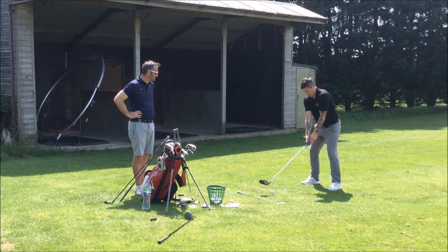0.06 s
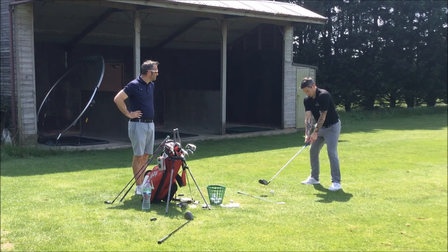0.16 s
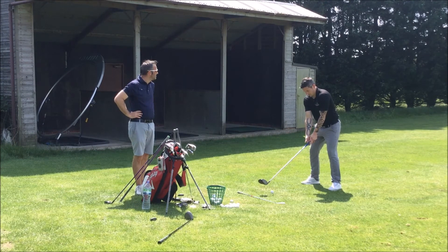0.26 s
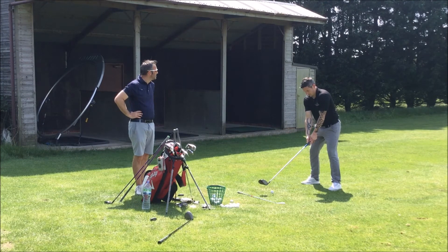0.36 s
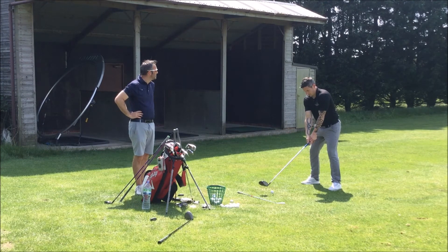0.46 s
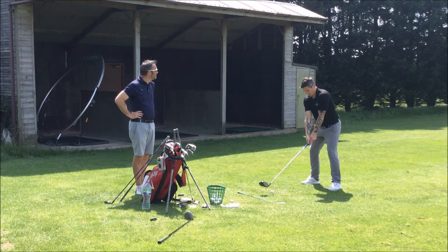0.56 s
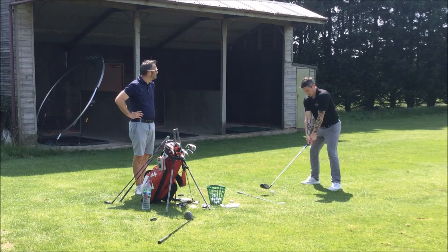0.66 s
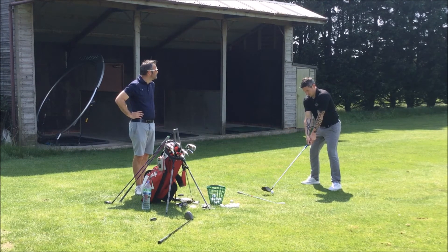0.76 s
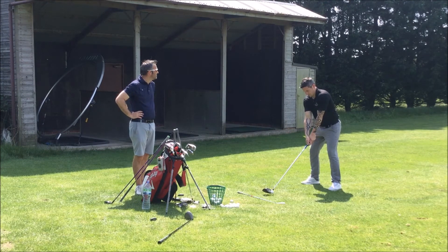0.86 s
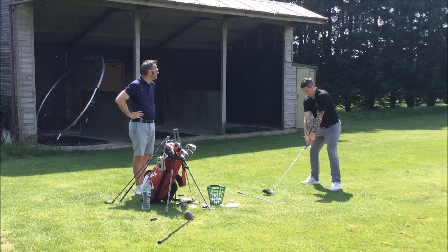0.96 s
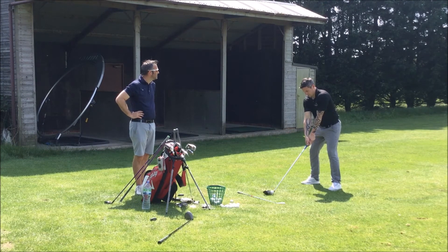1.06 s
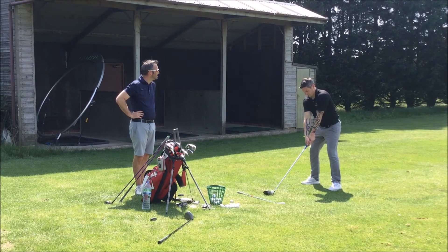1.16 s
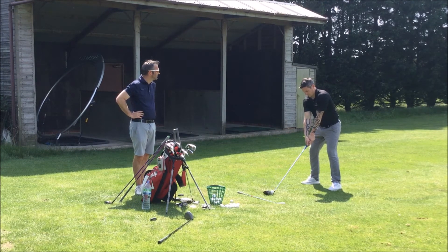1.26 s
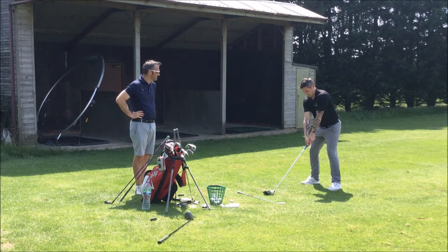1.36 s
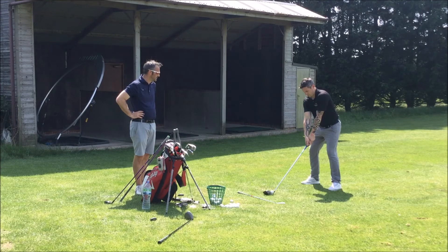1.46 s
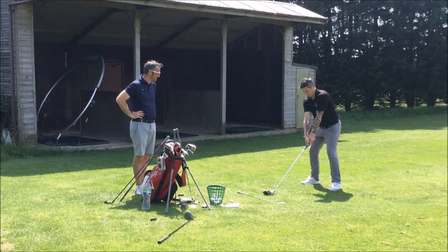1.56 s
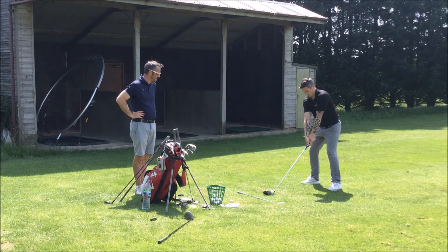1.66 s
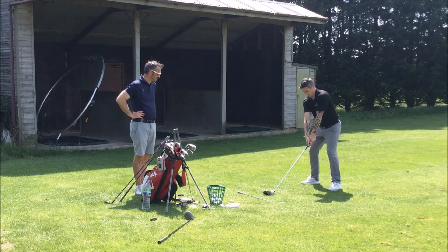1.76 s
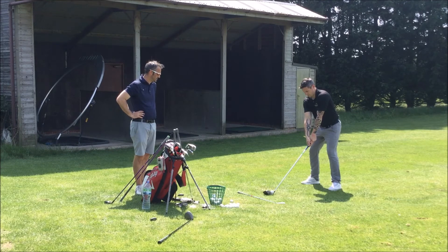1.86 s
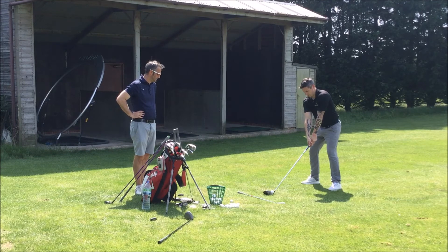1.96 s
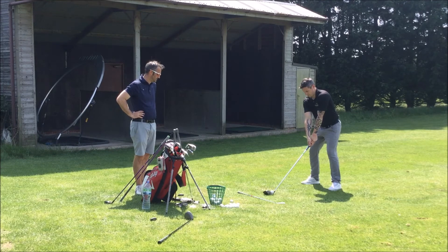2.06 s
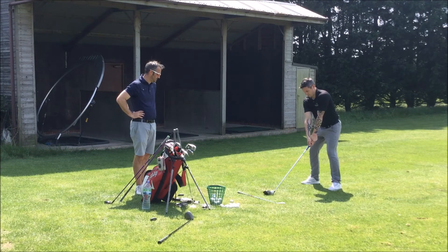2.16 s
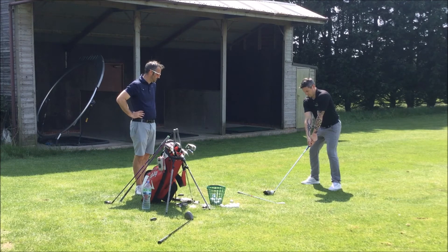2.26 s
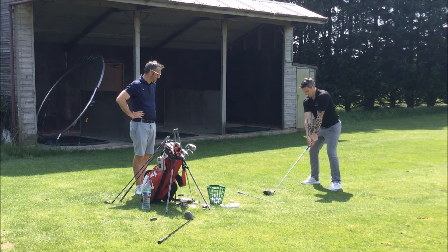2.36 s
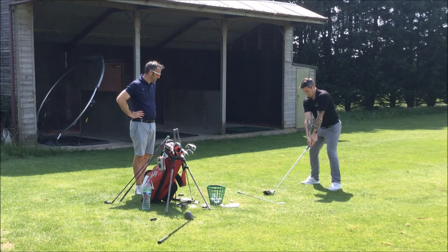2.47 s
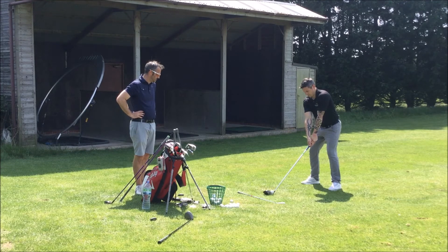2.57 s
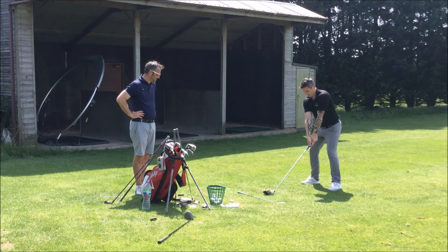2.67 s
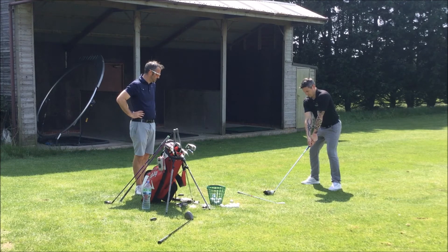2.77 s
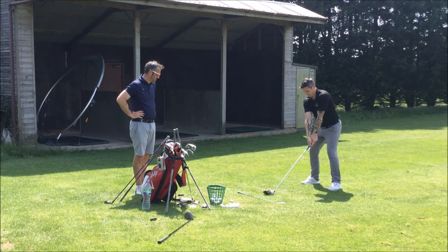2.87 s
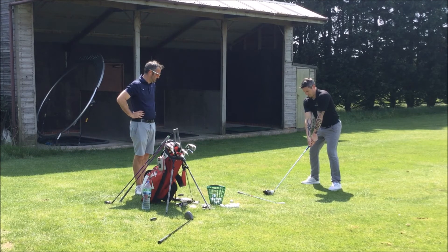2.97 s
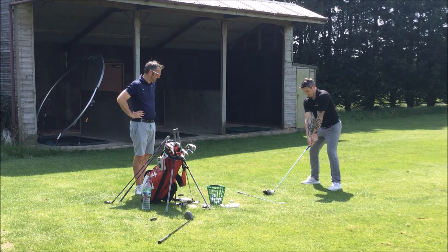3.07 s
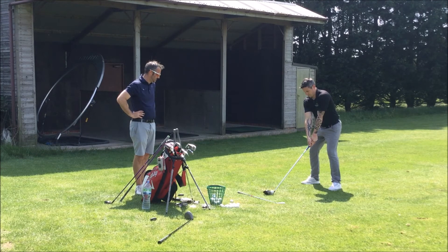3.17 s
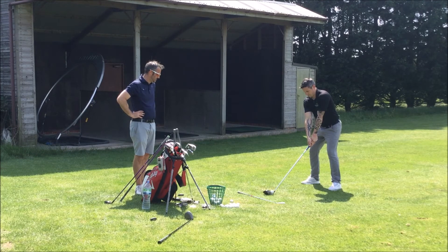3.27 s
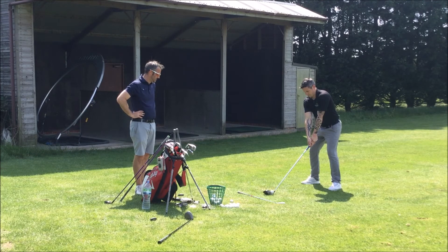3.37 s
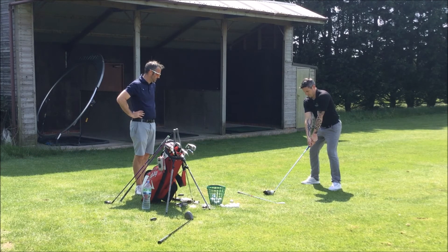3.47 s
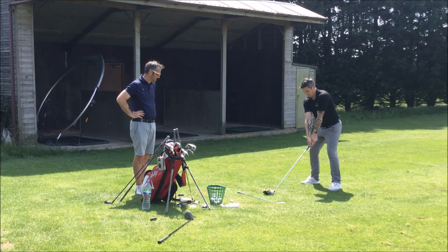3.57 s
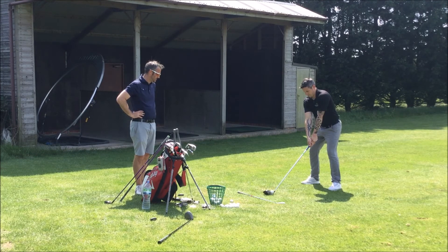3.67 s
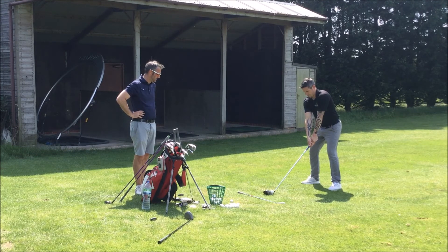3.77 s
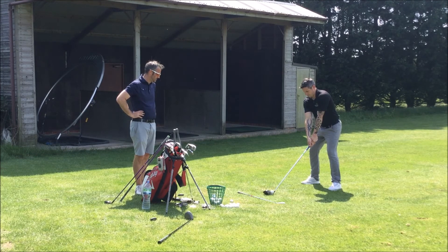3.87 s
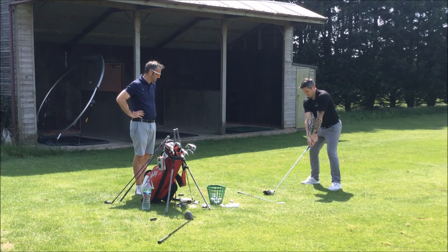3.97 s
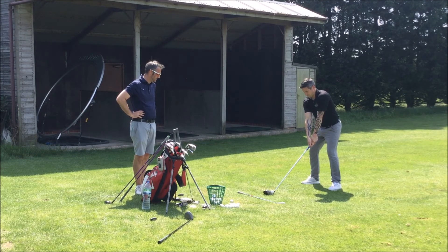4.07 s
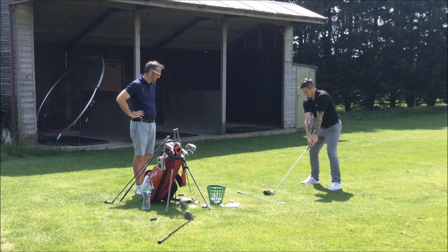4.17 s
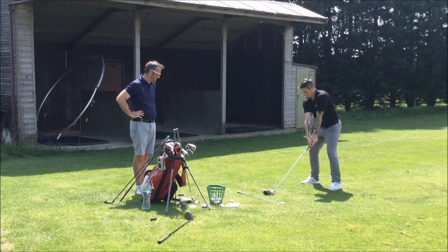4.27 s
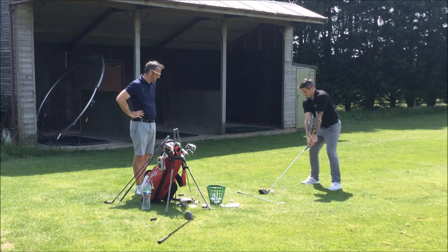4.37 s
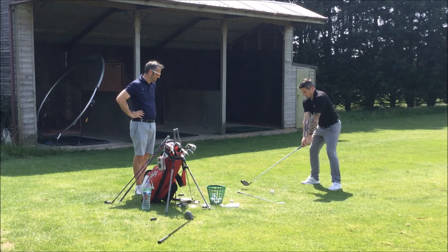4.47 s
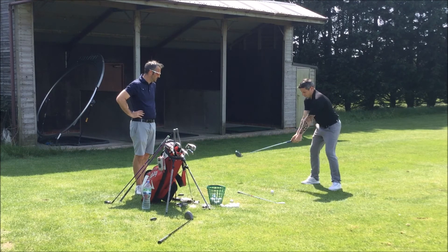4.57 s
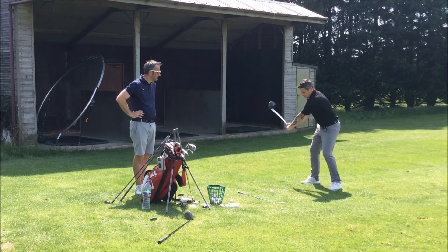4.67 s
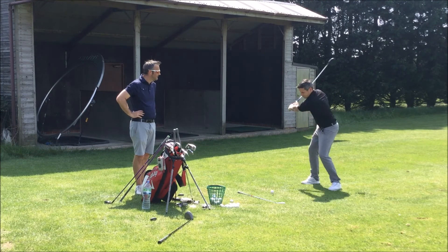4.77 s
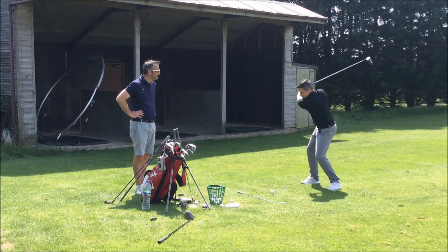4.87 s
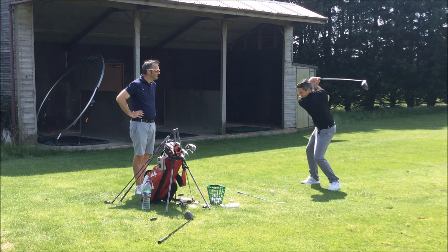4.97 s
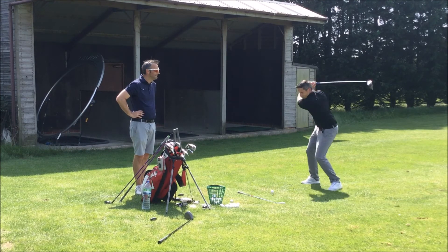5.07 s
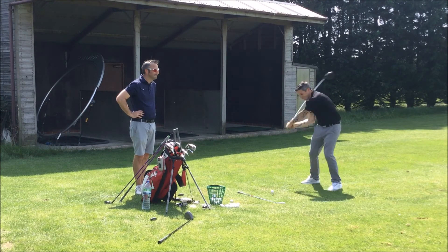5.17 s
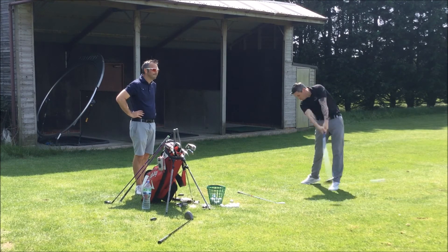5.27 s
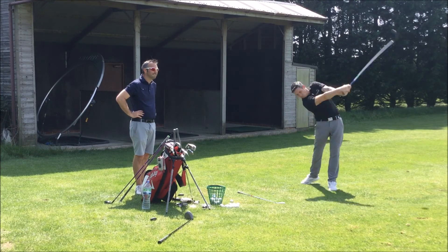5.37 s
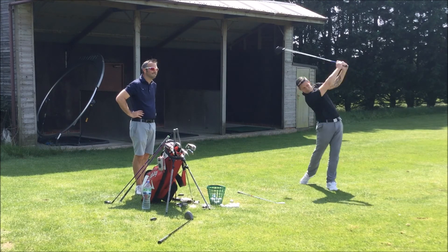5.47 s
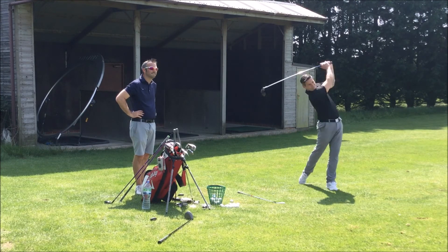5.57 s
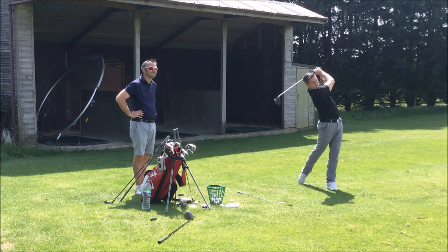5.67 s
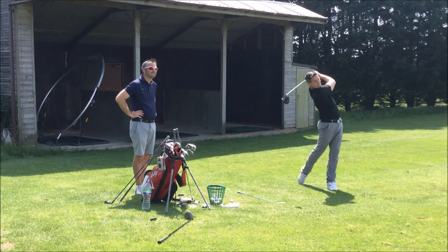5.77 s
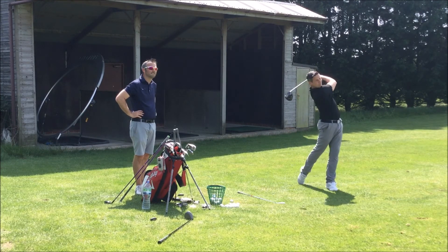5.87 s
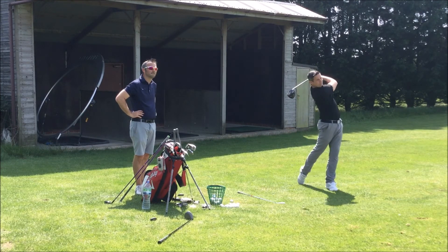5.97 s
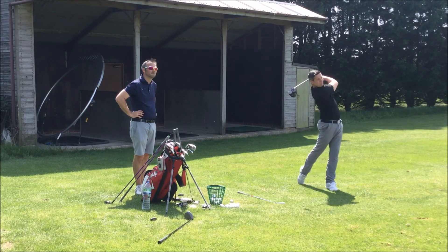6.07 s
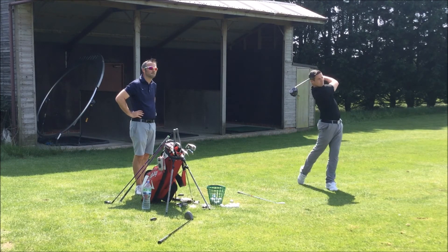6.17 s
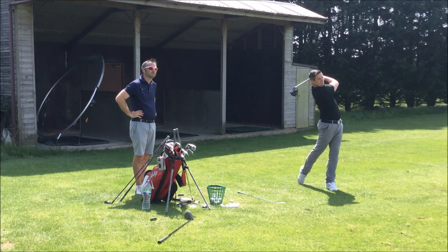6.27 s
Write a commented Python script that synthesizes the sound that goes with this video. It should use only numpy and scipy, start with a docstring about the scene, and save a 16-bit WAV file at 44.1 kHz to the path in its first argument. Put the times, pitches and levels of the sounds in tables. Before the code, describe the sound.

For the first five seconds the scene is very quiet: a low, fluttering distant rumble with slow swells around 0.6, 1.4, 2.3 and 4.5 s, and a faint airy hiss. Birds whistle softly, directly and blurred through trees: faint coos near 0.1, 0.4 and 2.2 s, clearer fluted notes around 1.3 to 1.8 s, high chirps just after 2 s, warbling trills at 2.8, 3.0 and 3.3 s, then scattered calls and twittering until about 5 s. At 4.6 s a barely audible brush of grass begins the backswing. From about 5.3 s a swish rises rapidly, and at 5.43 s the driver hits with a huge, sharp, hollow metallic crack, softly overloaded, with a short low thump. Bounces from turf and shed and a scattered tail fade quickly, with a weak late echo near 5.85 s. Quiet rumble and faint twittering remain until 6.3 s.

```python
"""Birds sing in the trees over a low, distant rumble; then a golfer drives off the tee, a few metres away.
The birds are gliding tones, direct and smeared by the trees; the rumble is shaped, fluttering noise.
The club swishes down as noise that rises with its speed; the hollow metal head cracks (noise) and rings (modes).
Turf, an open shed and a row of trees throw the blow back as single bounces and as a scattered tail.
The microphone's low cut rings after the blow as a low thump, and the crack overloads it softly."""
import sys
import numpy as np
from scipy import signal
from scipy.fft import rfft, irfft, next_fast_len
from scipy.io import wavfile

SR = 44100
rng = np.random.default_rng(int(sys.argv[2]) if len(sys.argv) > 2 else 0)


def master_out(mix):
    """Clip the mix to full scale and print it as 16-bit PCM to the path in sys.argv[1]."""
    frames = np.transpose(np.atleast_2d(mix))
    ceiling = np.clip(frames, -1, 1)
    pcm = np.round(ceiling * 32767).astype(np.int16)
    wavfile.write(sys.argv[1], SR, pcm)


N = 279329

# distant background, relative colour: (f/Hz, density/dB per Hz)
AIR_COLOUR = [(25, -31.5), (50, -15), (85, -0.5), (130, -13), (175, -11.5), (250, -24), (330, -27.5),
              (450, -34.5), (1000, -40), (2500, -44.5), (6500, -54), (8000, -56), (8800, -51), (10000, -55),
              (14000, -56.5), (16000, -73)]
# slow swells of the far rumble: (crest t/s, half-length/s, low f/Hz, high f/Hz, gain at the crest/dB)
RUMBLE_SWELLS = [(0.605, .25, 29.8, 111, 6.5), (1.4, .7, 25.1, 63, 10.5), (2.254, .35, 70.5, 129, 4),
                 (4.45, .35, 167, 406, 6)]

# whistles that start off pitch and settle: (t/s, length/s, settled f/Hz, start above it as a share, level/dB)
SLURRED_NOTES = [(0, 0.13, 1870, 0.23, -79.5), (0.426, 0.076, 2560, 0.19, -83),
                 (.954, 0.072, 3910, .02, -77), (1.154, 0.079, 2735, -0.012, -69.5),
                 (1.404, 0.1, 1782, 0.076, -69.5), (1.581, 0.16, 2145, 0.063, -61),
                 (1.803, 0.13, 2480, 0.062, -61.5), (1.97, 0.24, 2476, 0.0067, -85),
                 (2.088, 0.069, 4120, -.14, -76.5), (2.151, 0.064, 4860, -0.021, -68.5),
                 (2.282, 0.071, 4160, -.12, -74.5), (2.288, 0.11, 2100, 0.12, -80.5),
                 (2.339, 0.055, 4800, 0, -71.5), (3.408, 0.18, 2560, 0.13, -80),
                 (3.609, 0.21, 2220, 0.088, -73), (3.866, 0.078, 5490, 0.0034, -81),
                 (4.157, 0.031, 2810, 0.11, -75), (4.401, 0.027, 6700, -0.061, -85),
                 (4.556, 0.17, 4790, .04, -80)]
SETTLE_SHARE = 0.371  # time constant of the slide, share of the note's length
# a far pigeon's soft coos, all alike: (t/s, level/dB)
PIGEON_COOS = [(.063, -78), (.4, -77), (2.23, -78.5)]
COO_S, COO_HZ, COO_SLIDE = 0.13, 527, .08  # the slide is a share of the pitch
# runs of quick twittering further off:
# (start t/s, end t/s, centre f/Hz, pitch spread as a share, chirps per s, level before a common trim/dB)
TWITTER_RUNS = [(0.55, 1.204, 4740, 0.097, 68, -80.5), (1.298, 1.693, 3143, 0.07, 37, -75.5),
                (1.847, 2.417, 4810, 0.064, 60, -74), (3.104, 4.704, 3660, 0.22, 35, -81.5),
                (4.8, 5.107, 2342, 0.063, 40, -79.5), (5.901, 6.33, 3800, .2, 25, -90)]
# whistles that rise and fall back: (t/s, length/s, top f/Hz, pitch drop per half note as a share, level/dB)
ARCHED_NOTES = [(0.612, .22, 2460, 0.031, -76.5), (0.705, 0.17, 2226, 0.2, -70),
                (1.298, .15, 2092, .09, -65.5), (3.964, 0.025, 3000, 0.096, -73),
                (4.217, 0.071, 2062, 0.075, -73), (4.574, 0.063, 2680, 0.091, -77)]
ARCH_TOP_SHARE = .42  # of the note's length
# trills that warble around an arch:
# (t/s, length/s, top f of the arch/Hz, pitch drop per half note as a share, warble depth/Hz, level/dB)
TRILLED_NOTES = [(1.027, 0.16, 2290, 0, 355, -73), (2.771, 0.15, 2352, 0.058, 71, -64),
                 (3.012, 0.15, 2373, .05, 84, -61), (3.299, .094, 3097, 0.14, 115, -65.5),
                 (3.474, 0.116, 1370, 0, 25, -81), (4.466, 0.08, 2160, 0, 92, -72.5)]
TRILL_TOP_SHARE, TRILL_RATE = 0.74, 42  # share of the note's length, mean warbles per s
# quick swoops that dive and climb again: (t/s, level/dB)
SWOOP_NOTES = [(3.699, -83), (3.886, -82.5), (4.08, -78.5)]
SWOOP_S, SWOOP_TURN_SHARE = .11, 0.25  # length, share of it spent diving
SWOOP_START_HZ, SWOOP_LOW_HZ, SWOOP_END_HZ = 4000, 2900, 4550

STRIKE_S = 5.4266
SPEED_UP_S, SLOW_DOWN_S = .11, 0.067  # time constants of the club's speed before and after the strike
# shaft eddies and head hiss at top speed; each level grows as a power of the speed
EDDY_HZ, EDDY_DB, EDDY_POWER = 1080, -37.5, 5.9
HISS_DB, HISS_POWER = -34, 8.3
# modes of club head and ball:
# (f/Hz, level towards the microphone/dB, T60/s, level towards the surroundings before a common trim/dB)
HEAD_MODES = [(452, -15.5, 0.022, -37), (546, -5, 0.022, -28.5), (740, -2, .022, -26.5),
              (1047, -17, 0.016, -33), (1384, -9, 0.02, -31.5), (2117, -30, 0.12, -38),
              (2300, -23.5, 0.065, -35), (3340, -29, 0.061, -42.5), (3910, -9, .025, -38),
              (4348, -27, 0.078, -27), (4580, -19.5, .025, -42.5), (5150, -36, .05, -35),
              (5950, -14, 0.029, -35), (6070, -15, .025, -36), (7090, -22, .025, -38.5),
              (9100, -18, 0.052, -37.5), (8530, -11, 0.05, -35.5), (8530, -17, 0.039, -33),
              (9200, -13.5, .04, -36.5), (10400, -13, 0.034, -42.5), (11670, -22.5, 0.073, -38),
              (12880, -16.5, 0.019, -39)]
# relative colour of the contact crack: (f/Hz, level/dB)
CRACK_COLOUR = [(150, -5), (450, 6.5), (700, 2.5), (1100, -6), (2000, -6.5), (2800, -19), (4000, -3.5),
                (7500, -6), (10000, 1), (12500, -3), (16000, -13)]

# single bounces from turf, shed and far trees: (delay t/s, level/dB, treble limit f/Hz)
BOUNCES = [(.0078, -20.5, 18440), (.036, -29, 8973), (0.059, -31, 9000), (.066, -29.5, 9000),
           (0.077, -22, 9300), (.425, -60, 3000)]
# scattered sound from lawn, shed, its inside and the trees: (delay t/s, build-up/s, T60/s, level/dB)
SCATTER_TAILS = [(.008, 0.0034, 0.15, -0.5), (.062, 0.013, 0.3, -4.5), (0.14, .03, .7, -20.5),
                 (.418, 0.015, 0.35, -34)]
# relative colour of the scattered sound: (f/Hz, level/dB)
TAIL_COLOUR = [(70, -8.5), (160, 10), (400, 0.5), (700, -4), (1100, -1), (2200, 1.5), (2900, -8.5),
               (3700, -8), (5400, 1), (7500, -2), (8800, 1.5), (10000, -4.5), (13000, -5.5), (16000, -13)]
TOP_HZ = 15700  # upper limit at the microphone


def undb(db):
    """Decibels to gain."""
    return 10 ** (np.asarray(db) / 20)


def unit(x):
    """Scale to rms 1."""
    return x / np.sqrt(np.mean(x ** 2))


def clock():
    """Time of every sample in s."""
    return np.arange(N) / SR


def noise(points):
    """Noise of rms 1 with a spectrum of (f/Hz, level/dB) points, joined over log frequency."""
    hz, db = np.transpose(points)
    size = next_fast_len(N)
    f = np.maximum(np.fft.rfftfreq(size, 1 / SR), 1)
    gain = undb(np.interp(np.log(f), np.log(hz), db))
    spectrum = rfft(rng.standard_normal(size)) * gain
    return unit(irfft(spectrum, size)[:N])


def band(x, hz, kind, order=2):
    """Butterworth filter."""
    sos = signal.butter(order, np.minimum(hz, SR / 2 - 1), kind, fs=SR, output="sos")
    return signal.sosfilt(sos, x)


def smooth(x, hz, kind):
    """Filter forwards and backwards, so that the part stays in phase with the whole."""
    forwards = band(x, hz, kind)
    return band(forwards[::-1], hz, kind)[::-1]


def fade(t, t60):
    """Exponential decay that starts at t = 0 and falls 60 dB in t60."""
    return (t >= 0) * np.exp(-np.log(1000) * np.maximum(t, 0) / t60)


def add(out, s, x):
    """Mix x into out from time s."""
    i = int(np.clip(s * SR, 0, N - 1))
    out[i:i + len(x)] += x[:N - i]


def walk(rate):
    """Slow chance: random values, rate per s, joined by straight lines."""
    return np.interp(clock() * rate, np.arange(1000), rng.standard_normal(1000))


def background(air_db=-58, flutter_db=2.0, flutter_rate=8, flutter_below_hz=300):
    """A far rumble that flutters and now and then swells, under a smooth, faint hiss."""
    air = noise(AIR_COLOUR)
    flutter = undb(flutter_db * walk(flutter_rate)) - 1
    out = air + flutter * smooth(air, flutter_below_hz, "low")
    for s, half_s, low_hz, high_hz, db in RUMBLE_SWELLS:
        crest = np.exp(-((clock() - s) / half_s) ** 2)
        rise = undb(db * crest) - 1
        out = out + rise * smooth(air, [low_hz, high_hz], "band")
    return undb(air_db) * out


def whine(hz=9000, db=-99):
    """A very faint, steady whine of the recorder's electronics."""
    return undb(db) * unit(np.sin(2 * np.pi * hz * clock()))


def progress(length):
    """Runs from 0 to 1 over a note of this length in s."""
    return np.linspace(0, 1, int(length * SR))


def wander(u):
    """A random curve over the course of a note."""
    return np.interp(u, np.linspace(0, 1, 10), rng.standard_normal(10))


def whistle(u, hz, waver=0.0069, swell=0.61, flutter_db=2):
    """A pure tone that swells and fades, wavering a little in pitch and strength."""
    level = np.sqrt(2) * np.sin(np.pi * u) ** swell * undb(flutter_db * wander(u))
    wavering_hz = hz * (1 + waver * wander(u))
    return level * np.sin(2 * np.pi * np.cumsum(wavering_hz) / SR)


def slur(length, hz, slide):
    """A whistle that slides onto its pitch."""
    u = progress(length)
    return whistle(u, hz * (1 + slide * np.exp(-u / SETTLE_SHARE)))


def coo():
    """A low, soft note that sags a little."""
    return slur(COO_S, COO_HZ, COO_SLIDE)


def twitter(chirp_s=0.032):
    """Runs of short chirps, each bending through three random pitches; a run swells and fades."""
    out, u = np.zeros(N), progress(chirp_s)
    for start, end, hz, spread, rate, db in TWITTER_RUNS:
        length = end - start
        for place in rng.random(int(length * rate)):
            bend = np.interp(u, [0, .5, 1], rng.standard_normal(3))
            chirp = whistle(u, hz * (1 + spread * bend))
            add(out, start + place * length, undb(db) * np.sin(np.pi * place) * chirp)
    return out


def arch(length, hz, depth):
    """A whistle that rises and falls at the same pace."""
    u = progress(length)
    return whistle(u, hz * (1 - 2 * depth * np.abs(u - ARCH_TOP_SHARE)))


def trill(length, hz, depth, warble_hz, uneven=.35):
    """An arched whistle whose pitch warbles at an uneven rate."""
    u = progress(length)
    rate = TRILL_RATE * (1 + uneven * wander(u))
    warble = np.sin(2 * np.pi * np.cumsum(rate) / SR)
    arched_hz = hz * (1 - 2 * depth * np.abs(u - TRILL_TOP_SHARE))
    return whistle(u, arched_hz + warble_hz * warble)


def swoop():
    """A steep dive and a slower, fainter climb, never twice the same in its wavering."""
    u = progress(SWOOP_S)
    hz = np.interp(u, [0, SWOOP_TURN_SHARE, 1], [SWOOP_START_HZ, SWOOP_LOW_HZ, SWOOP_END_HZ])
    return unit(np.exp(-u) * whistle(u, hz, waver=.02, flutter_db=5.5))


def birds(wood_db=-2, wood_t60=0.29, twitter_db=-2):
    """Fluted notes come direct and through the trees; far twittering arrives mostly as a smear."""
    calls = [(slur, SLURRED_NOTES), (coo, PIGEON_COOS), (arch, ARCHED_NOTES),
             (trill, TRILLED_NOTES), (swoop, SWOOP_NOTES)]
    song = np.zeros(N)
    for call, table in calls:
        for s, *shape, db in table:
            add(song, s, undb(db) * call(*shape))
    far = undb(twitter_db) * twitter()
    wood = rng.standard_normal(SR) * fade(clock()[:SR], wood_t60)
    wood = wood / np.linalg.norm(wood)
    smeared = signal.fftconvolve(undb(wood_db) * song + far, wood)[:N]
    return song + far / 2 + smeared


def takeaway(s=4.6, length_s=.035, db=-79):
    """The club head brushes the grass as the backswing starts: a short, high burst of noise."""
    brush = unit(band(rng.standard_normal(N), [8000, 15000], "band"))
    return undb(db) * np.exp(-((clock() - s) / length_s) ** 2) * brush


def swish(width_hz=260):
    """Eddies shed by the shaft rise in pitch with its speed; the head adds hiss when fastest."""
    t = clock() - STRIKE_S
    speed = np.exp(np.minimum(t / SPEED_UP_S, -t / SLOW_DOWN_S))  # 1 at the strike
    carrier = np.sin(2 * np.pi * np.cumsum(EDDY_HZ * speed) / SR)
    eddies = unit(band(rng.standard_normal(N), width_hz, "low") * carrier)
    hiss = noise([(200, -2.5), (2200, -3.5), (3000, -9.0), (8300, -10.0), (10000, -15.5), (16000, -22.0)])
    return undb(EDDY_DB) * speed ** EDDY_POWER * eddies + undb(HISS_DB) * speed ** HISS_POWER * hiss


def impact(crack_db=-3, crack_t60=0.022, contact_s=.0003, spray_db=3, spray_ring_db=-4):
    """A broad crack and the ringing head, towards the microphone and all around: each mode beams its own way."""
    t = clock()[:SR // 5]
    ahead = undb(crack_db) * fade(t, crack_t60) * noise(CRACK_COLOUR)[:len(t)]
    around = undb(spray_db) * signal.unit_impulse(len(t))
    for k, (hz, ahead_db, t60, around_db) in enumerate(HEAD_MODES):
        mode = fade(t, t60) * np.exp(2j * np.pi * hz * t)
        sign = (-1) ** k
        ahead = ahead + sign * undb(ahead_db) * mode.imag
        # summed over all directions, the modes stand on the click without cancelling it
        around = around + undb(around_db + spray_ring_db) * mode.real
    return ahead * np.minimum(t / contact_s, 1), around


def thump(db=-4, t60=.06, rise_s=0.00017):
    """The microphone's low cut rings after the blow's pressure pulse, in a few swings that sink in pitch."""
    t = clock()[:SR // 5]
    hz = 58 + 210 * np.exp(-t / .003)
    swings = np.sin(2 * np.pi * np.cumsum(hz) / SR)
    return -undb(db) * swings * fade(t, t60) * (1 - np.exp(-t / rise_s))


def reflections(x):
    """Single bounces from the turf, the walls of the shed and the far trees, each with its treble dulled."""
    response = np.zeros(SR // 2)
    for delay, db, top_hz in BOUNCES:
        bounce = band(signal.unit_impulse(64), top_hz, "low", order=1)
        add(response, delay, undb(db) * bounce)
    return signal.fftconvolve(x, response)[:N]


def scatter(x, dull_hz=8000, dull_s=0.23):
    """Many small reflections of uneven size, losing treble the further they travel."""
    t = clock()[:SR]
    power = 0
    for delay, build, t60, db in SCATTER_TAILS:
        build_up = np.exp(-((t - delay) / build) ** 2)
        shape = np.where(t < delay, build_up, fade(t - delay, t60)) ** 2
        power = power + undb(db) ** 2 * shape / shape.sum()
    sizes_db = 3 * np.interp(t, np.linspace(0, 1, 500), rng.standard_normal(500))
    grain = unit(undb(sizes_db) * noise(TAIL_COLOUR)[:SR])
    fresh = np.exp(-t / dull_s)  # share that still has its treble
    dulled = fresh * grain + (1 - fresh) * smooth(grain, dull_hz, "low")
    return signal.fftconvolve(x, np.sqrt(power) * dulled)[:N]


def scene(thump_lag_s=0.0019, club_send_db=-26):
    """The drive with its echoes, over birds and background."""
    blow, low_thump, spray = np.zeros((3, N))
    ahead, around = impact()
    add(blow, STRIKE_S, ahead)
    add(spray, STRIKE_S, around)
    add(low_thump, STRIKE_S + thump_lag_s, thump())
    club = blow + swish()
    echoes = reflections(club) + scatter(spray + undb(club_send_db) * club)
    surroundings = background() + whine() + birds()
    return (surroundings + takeaway() + club + low_thump + echoes)[None]


def record(dry):
    """The crack overloads the microphone softly for a moment; the top is cut."""
    clipped = dry / (1 + dry ** 4) ** (1 / 4)
    top_cut = signal.ellip(8, .2, 70, TOP_HZ, fs=SR, output="sos")
    return signal.sosfilt(top_cut, clipped)


dry = scene()
out = record(dry)
master_out(out)
```